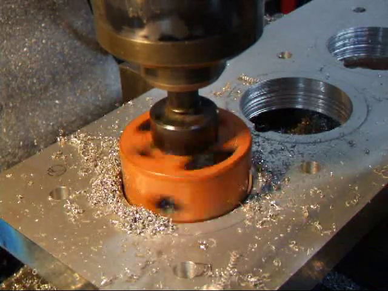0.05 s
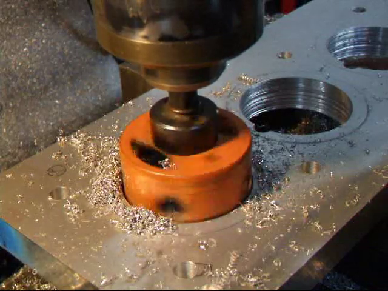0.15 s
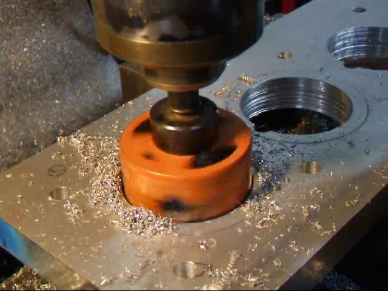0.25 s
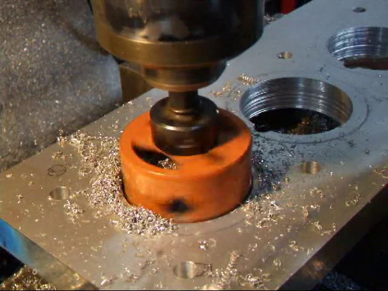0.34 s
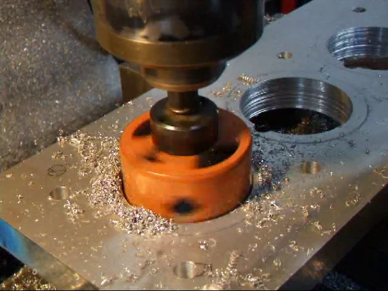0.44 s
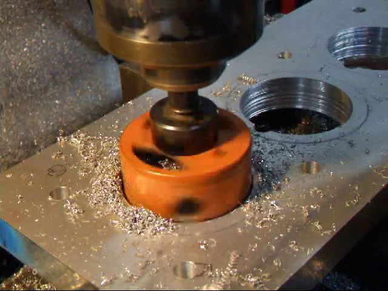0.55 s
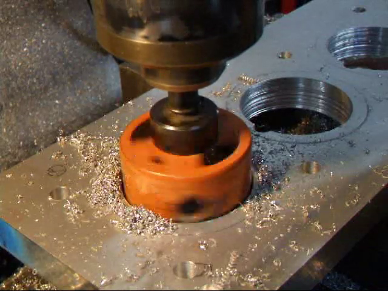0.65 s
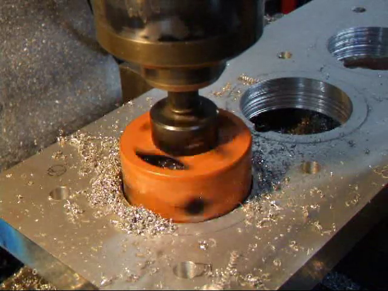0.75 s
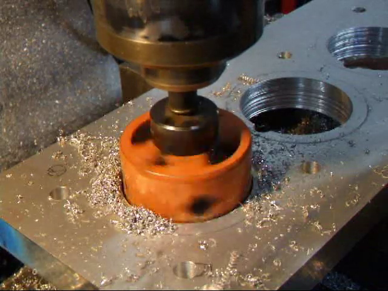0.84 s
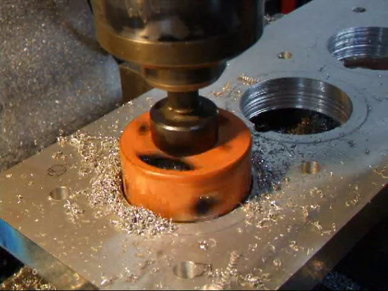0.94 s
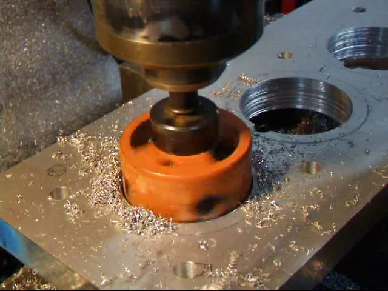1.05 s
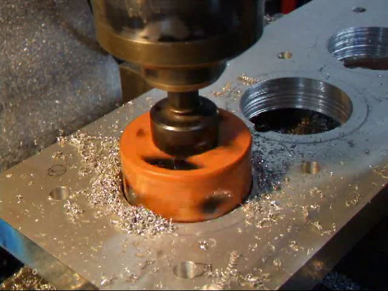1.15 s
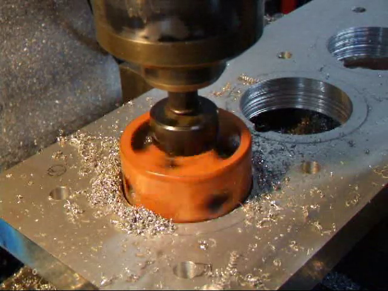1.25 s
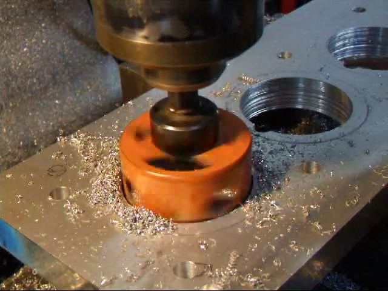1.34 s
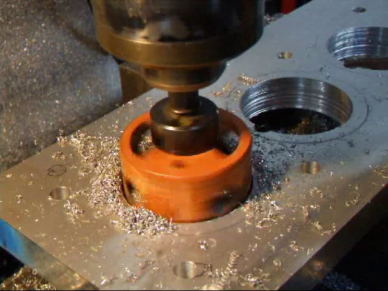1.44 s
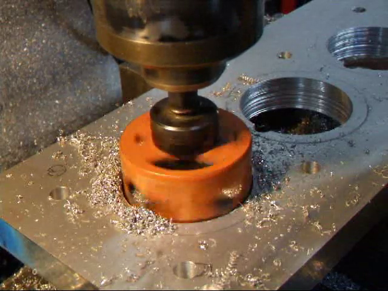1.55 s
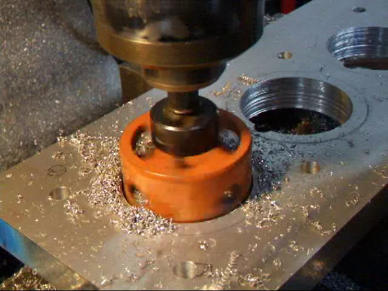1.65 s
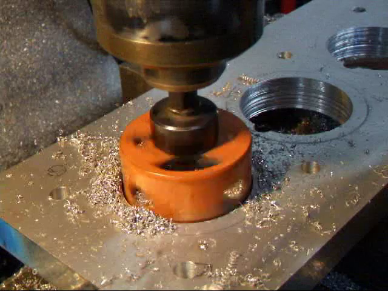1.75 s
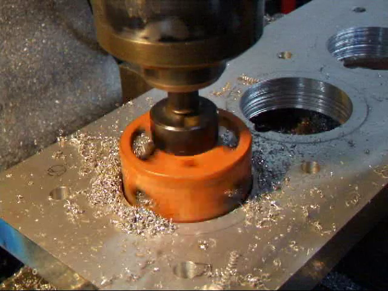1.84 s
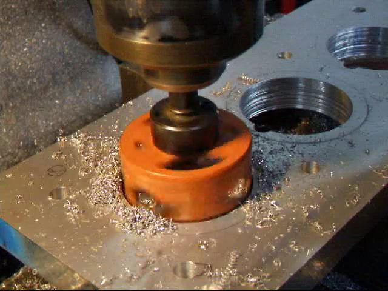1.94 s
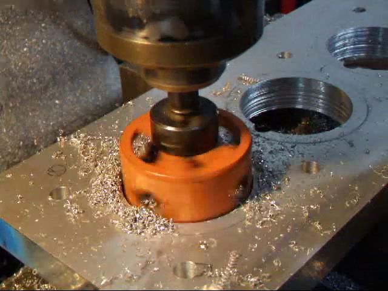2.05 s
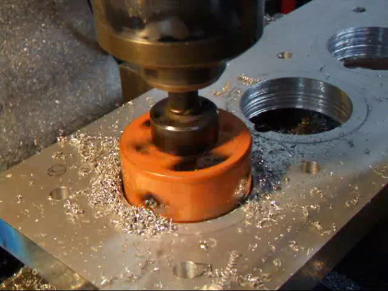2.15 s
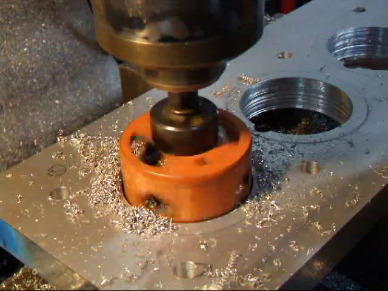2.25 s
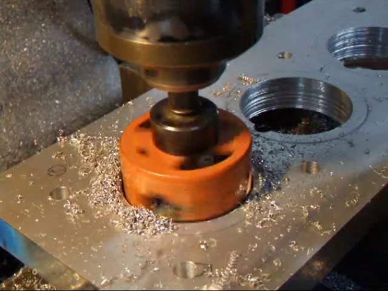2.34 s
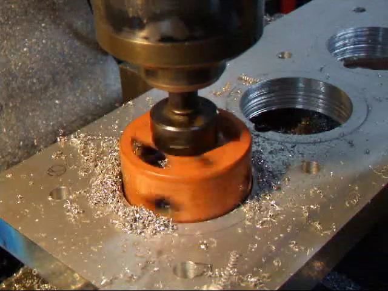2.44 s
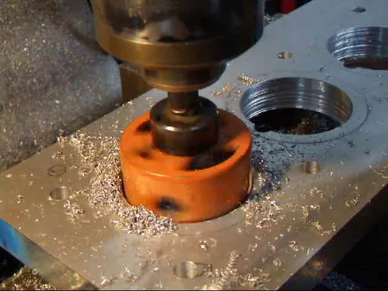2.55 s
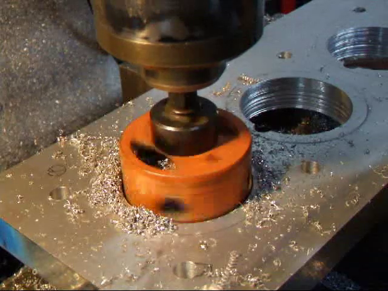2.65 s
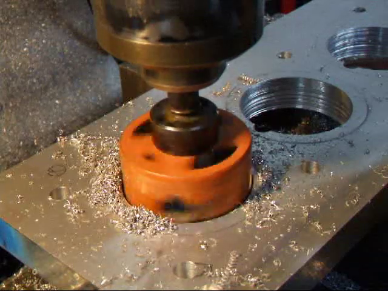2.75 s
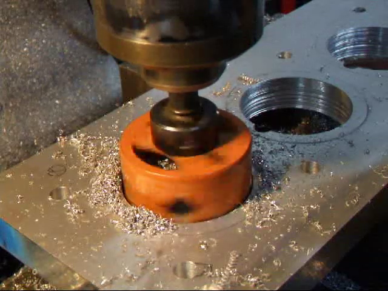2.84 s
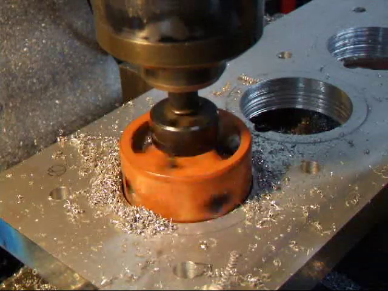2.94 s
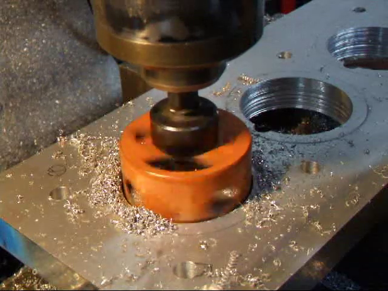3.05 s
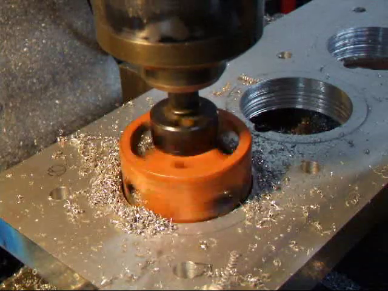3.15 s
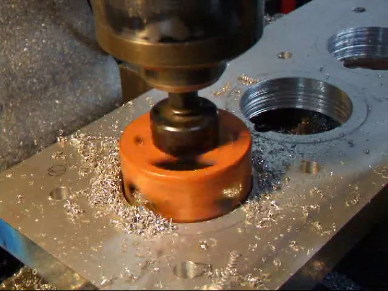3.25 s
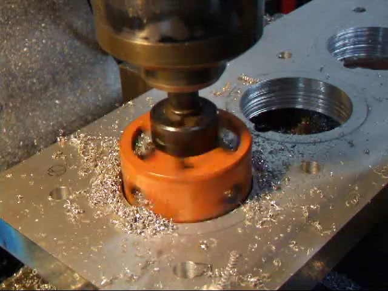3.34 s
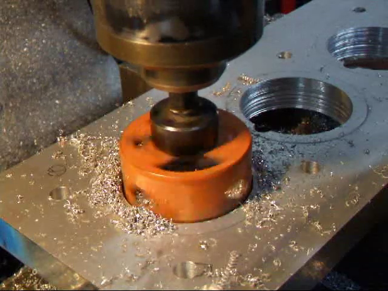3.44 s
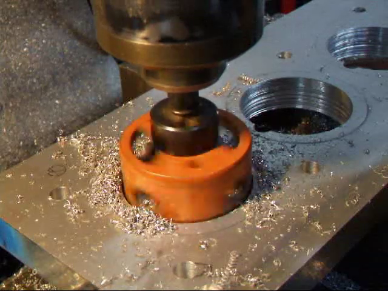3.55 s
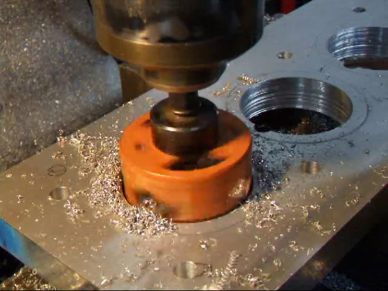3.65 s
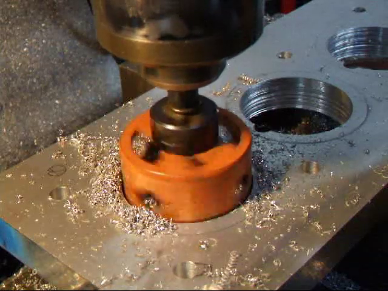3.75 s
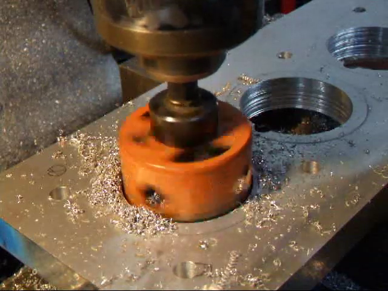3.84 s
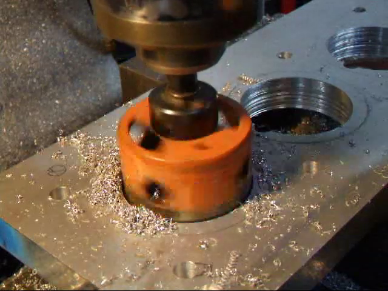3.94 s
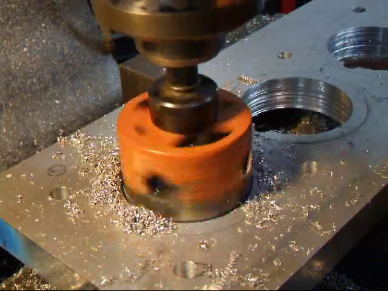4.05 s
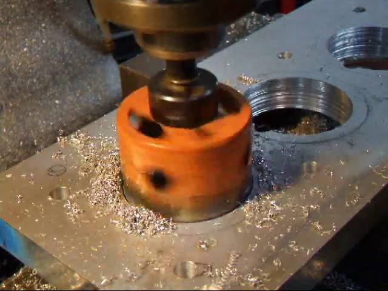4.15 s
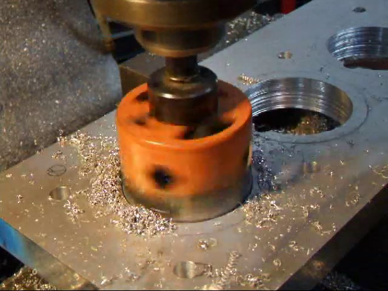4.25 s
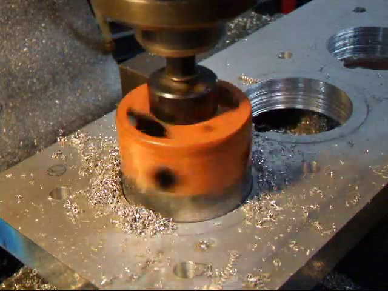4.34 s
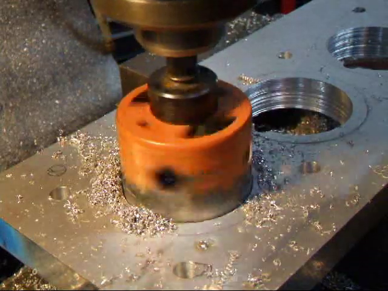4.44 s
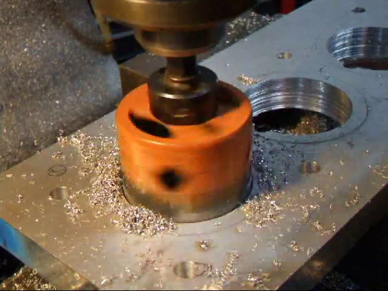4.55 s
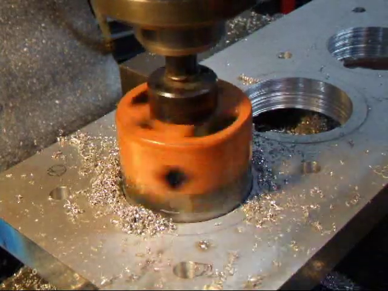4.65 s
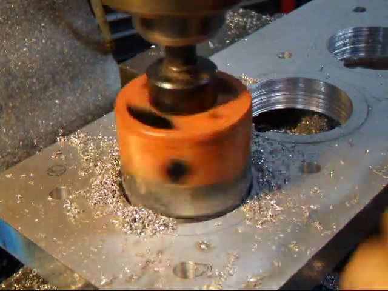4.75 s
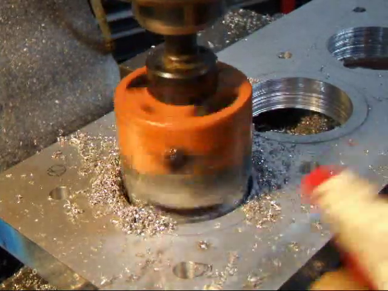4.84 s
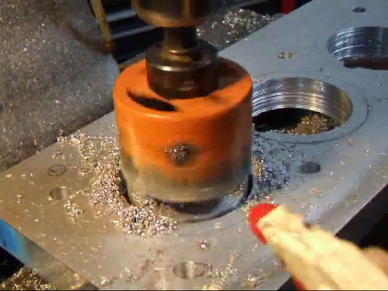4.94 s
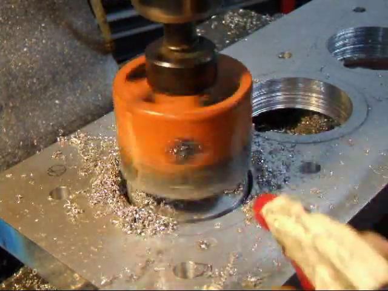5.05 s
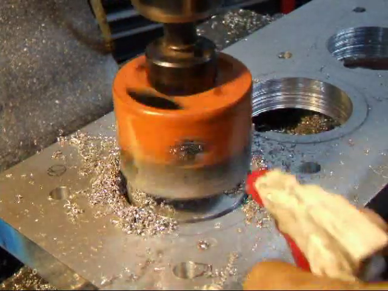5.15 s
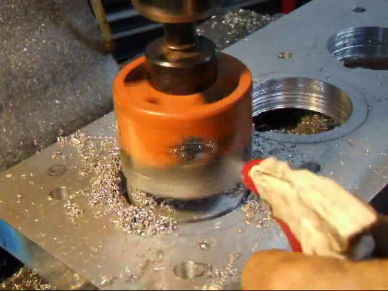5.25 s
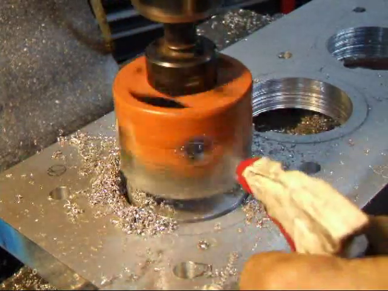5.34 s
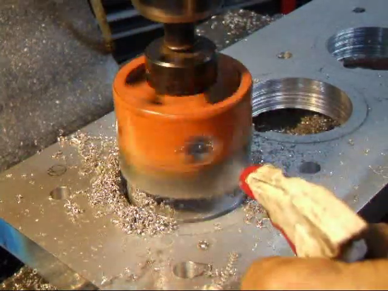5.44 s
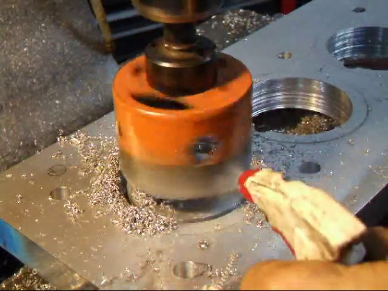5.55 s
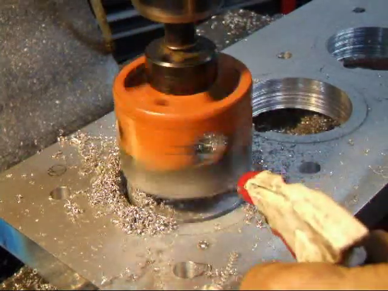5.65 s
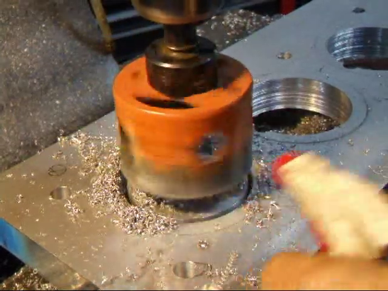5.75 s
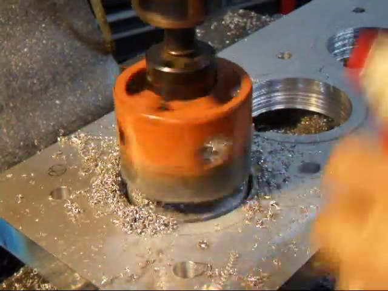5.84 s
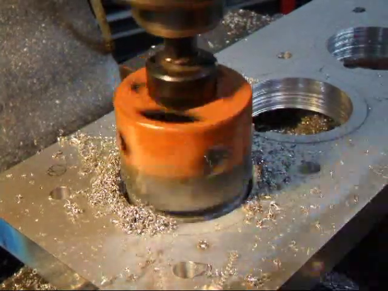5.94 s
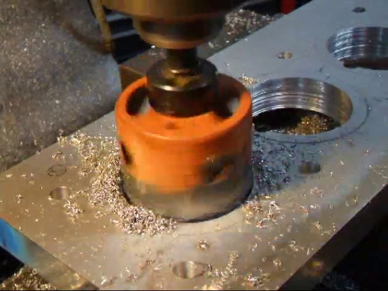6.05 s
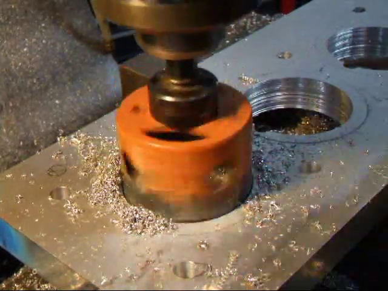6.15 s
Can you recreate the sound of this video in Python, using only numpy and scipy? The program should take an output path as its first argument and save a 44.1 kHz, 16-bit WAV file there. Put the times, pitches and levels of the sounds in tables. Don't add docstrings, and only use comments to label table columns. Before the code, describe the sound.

A milling machine cuts metal with coarse, uneven chatter: abrupt honking rasps about every half second, gritty and bright, over low rumble. The cutting stops past the middle, leaving a few hard metallic clacks and thin, high squeaks as the saw comes out. Then mainly the machine runs, a fluttering gear whine and hollow roar gradually rising. The close microphone catches little room echo, dull at the very top.

```python
import sys
import numpy as np
from scipy import signal
from scipy.fft import rfft, irfft
from scipy.io import wavfile
from scipy.ndimage import uniform_filter1d

SR = 44100
rng = np.random.default_rng(int(sys.argv[2]) if len(sys.argv) > 2 else 0)


def boost_factor(decibels):
    exponent = np.asarray(decibels, float) / 20
    return 10 ** exponent


def persist_wave(psi):
    counts = np.round(np.clip(psi, -1, 1) * 32767).astype(np.int16)
    wavfile.write(sys.argv[1], SR, np.atleast_2d(counts).T)


N = 273861
TIME = np.arange(N) / SR
STEP = 32

# frequency in Hz, density in dB per Hz.
ROAR_SPECTRUM = [(190, -50), (330, -19.5), (597, -9.5), (664, -9), (728, -9), (873, -9.5), (1060, -8.5),
                 (2240, -22), (5420, -25.5), (8040, -31), (10900, -33.5), (11600, -26), (12500, -114),
                 (16200, -144), (22000, -120)]
RUMBLE_SPECTRUM = [(50, -12), (85, -10), (113, 7), (179, -3), (205, -4), (247, 6.5), (340, -12), (440, -39),
                   (750, -120)]
HUM_SPECTRUM = [(8.8, -29), (15, -18), (19, 3), (32, -2), (65, 3), (90, -1), (120, -23), (200, -120)]
# frequency in Hz, width in Hz, level in dB.
HOUSING_MODES = [(369, 73, -9.5), (596.3, 11, -5.5), (1096, 146, -6.5)]
BEARING_WHISTLES = [(3741, 10, -21), (2390, 10, -19)]
# frequency in Hz, level in dB, swell in dB, lag in turns.
GEAR_LINES = [(377.3, -14.5, 6, 0), (633, -10, 1, 1), (603, -18, 8.5, 0.27), (584.5, -14, 9.5, 0.44)]
MAIN_MESH = (728.7, -4, 10.5, 0)
BELT_DRONE = (99.5, -4.5, 3.5, 3.5)
PULSING_WHISTLE = (4810, -20, 6, 0)
# time in seconds, level in dB.
IDLE_GAIN = [(0, -40), (3.75, -40.5), (3.85, -43.5), (4.04, -43), (4.16, -40), (4.7, -34.5), (5.3, -33),
             (6.0, -32), (6.21, -29.5)]
# centre in seconds, half length in seconds, depth in dB.
BASS_DIPS = [(.2, 0.09, -2.5), (.52, 0.057, -19), (.97, 0.065, -36), (1.08, .06, -5), (1.21, 0.092, -8),
             (1.8, 0.086, -26), (2.23, 0.12, -26), (2.6, 0.075, -8), (3.03, 0.064, -36),
             (3.445, 0.059, -30)]
SHAFT_HZ, SHAFT_PEAK_S = 11.06, 4.519
HUM_DB = -62.5
BASS_DB, GROWL_BASS_DB, CUT_BASS_DB = -4, 6, -4.5
BASS_FOLLOW = 0.64

# start in seconds, peak in dB, main ring in Hz, rim rings in dB.
BORE_KNOCKS = [
    (3.6681, -11, 3052, -17),
    (3.716, -11, 1555, -21),
    (4.1172, -16.5, 1568, -38),
    (4.2052, -8.5, 1650, -24),
    (4.4578, -16, 1740, -18),
    (6.1948, -9.5, 1560, -21),
]
# multiple of the main ring, level in dB.
KNOCK_PARTIALS = [(1, 0.5), (1.32, -5), (1.55, -6.5), (2.1, -10), (2.9, -17)]
# frequency in Hz, width in Hz, level in dB.
RIM_MODES = [(7450, 72, 10.5), (8100, 85, 10.5), (5590, 182, 7.5)]
# slip in seconds, swell in seconds, level in dB.
RIM_SQUEAKS = [
    (4.22, .02, -39),
    (4.41, 0.11, -47),
    (4.47, .02, -46),
    (4.6, 0.095, -44),
    (4.81, .12, -38),
]
SWELL_DB, SLIP_S = -21, 0.011
LIFT_S, LIFT_DB, LIFT_FADE_S = 3.76, -9.5, 0.21

# start in seconds, peak in dB.
CHIP_SNAPS = [(0.1187, 3), (0.4818, -15), (0.905, 1), (1.2986, -15), (1.4417, 1.5), (1.553, -7),
              (1.718, -19), (2.161, -2), (2.5731, -19), (2.7954, -3), (2.8292, 1), (2.9774, -4),
              (3.0989, 0.5), (3.182, -3.5), (3.2113, -25), (3.235, -1), (3.405, -18), (3.468, 0),
              (3.6607, -6), (3.7176, -3.5)]
RISE_S = .003
BLOW_HZ, BLOW_DB = 1620, -16

# frequency in Hz, density in dB per Hz.
SCRAPE_SPECTRUM = [(350, -60), (600, -115), (717, -20), (878, -16), (1010, -16.5), (1320, -15.5),
                   (2340, -19), (3010, -15.5), (4410, -21), (5070, -24.5), (6710, -16), (10900, -24),
                   (12500, -46), (16200, -77), (22000, -120)]
# frequency in Hz, width in Hz, level in dB.
CUP_MODES = [(1330, 8, -17), (1740, 310, -20), (2670, 230, -5.5), (3255, 53, -9), (4050, 76, 0.5),
             (5000, 340, -12), (5060, 280, 8.5), (5550, 340, 4), (6860, 67, -14), (9170, 13, -2),
             (11200, 190, -4)]
PLATE_MODES = [(800, 4.6, -18.5), (959, 14, -7), (1100, 280, -9.5), (1335, 46, -3)]
# multiple of the chatter, level in dB.
OVERTONES = [(2, 3.5), (3, -6), (4, -4)]
CUP_OVERTONES = [(4, -8), (5, -12), (6, -7), (7, -3), (8, -13), (9, -15.5), (11, -10), (12, -5), (13, -13),
                 (15, -9)]
HALF_LINES = [(1.5, -20.5), (2.5, 5), (3.5, -0.5), (4.5, -1.5), (5.5, -8.5), (6.5, -3), (7.5, -16),
              (8.5, -9), (9.5, -10.5)]
# time in seconds, share from 0 to 1.
GROWL = [(1.28, 0), (1.3, 1), (1.45, 1), (1.475, 0)]
# catch in seconds, hold in seconds, scrape in dB, chatter in dB, chatter change over the hold in dB.
BITES = [
    (.115, 0.16, -22, -26, -3),
    (.482, 0.18, -20.5, -19, -12),
    (0.904, 0.28, -20.5, -22, -14),
    (1.719, 0.26, -19.5, -21.5, -10),
    (2.157, 0.19, -21, -23.5, -8.5),
    (2.572, .27, -20, -22.5, -14),
    (2.977, .2, -20.5, -24, -9.5),
    (3.401, 0.2, -21, -24, -10.5),
]
GRIPS = [
    (1.09, 0.18, -23.5, -26.5, -4.5),
    (1.29, 0.15, -24, -29, 5),
    (1.48, 0.029, -29, -28.5, -1.5),
    (3.2, .04, -30, -30, -4),
    (3.65, 0.072, -29, -33, 6.5),
]
# centre in seconds, peak in dB, half length in seconds.
RING_UPS = [(0.336, -27, 0.018), (0.728, -28.5, 0.043), (1.58, -28.5, 0.035), (2.02, -30.5, 0.024),
            (2.416, -26.5, 0.044), (2.895, -27, 0.046), (2.961, -32, 0.017), (3.274, -27.5, 0.054)]
TEETH_HZ = 53
CATCH_RISE_S, GRIP_RISE_S, LET_GO_S = .009, .02, .045
CREEP_S, CREEP_DB = 0.024, 8.5
THIN_DB_PER_S, RUB_DB, RUB_TONE_DB = 29, -40.5, -40
CUT_HZ, FREE_HZ, CLIMB_HZ_PER_S = 428, 469.3, 55
SHALLOW_HZ, GROWL_SINK_HZ = 9, 9
OVER_DB, OVER_KNEE_DB, OVER_TRADE = -26, -24.5, 0.67
OVER_DROP, BUILD_S, OVER_FOLLOW = 0.99, 0.07, 0.25
HALF_DB, HALF_GROW_DB = -54.5, 23.5
WEAR_LINE_DB, WEAR_GRAIN_DB = -5.5, 5

# frequency in Hz, side minus mid in dB.
SIDE_SPECTRUM = [(60, -51), (150, -15), (360, -23), (880, -24.5), (2160, -15.5), (5290, -16.5),
                 (13000, -10.5)]
LEAN_DB = -0.48
CEILING = 1
# frequency in Hz, share of bands lost from 0 to 1.
DROPOUT = [(100, 0), (7000, .004), (8800, .03), (10000, .08), (10800, .2), (11250, .5), (11450, 1),
           (22000, 1)]


def evened(x):
    return x / np.sqrt(np.mean(x ** 2) + 1e-20)


def curves(rows, t=TIME):
    s, *columns = np.transpose(rows)
    return [np.interp(t, s, c) for c in columns]


def bumps(rows, t):
    return sum(height * np.clip(2 - 2 * abs(t - s) / half, 0, 1) for s, half, height in rows)


def drift(ms):
    size = max(int(ms * SR / 1000), 2)
    smooth = uniform_filter1d(rng.standard_normal(N), size)
    return evened(uniform_filter1d(smooth, size))


def coloured(x, points):
    f, db = np.transpose(points)
    hz = np.fft.rfftfreq(N, 1 / SR)
    gain_db = np.interp(np.log(hz + 1), np.log(f + 1), db)
    return irfft(rfft(x) * boost_factor(gain_db), N)


def resonate(x, hz, width):
    b, a = signal.iirpeak(hz, hz / max(width, 2), SR)
    return signal.lfilter(b, a, x)


def modes(x, rows):
    return sum(boost_factor(db) * evened(resonate(x, hz, width)) for hz, width, db in rows)


def gear(hz, db, swell_db, lag):
    shaft = 2 * np.pi * (SHAFT_HZ * (TIME - SHAFT_PEAK_S) - lag)
    turns = hz * TIME + .025 * np.sin(shaft) + .02 * drift(30) + rng.random()
    return boost_factor(db + swell_db * np.cos(shaft) + drift(53)) * np.cos(2 * np.pi * turns)


def machine():
    growl, = curves(GROWL)
    idle_db, = curves(IDLE_GAIN)
    gain_db = idle_db + 0.7 * bumps(BASS_DIPS, TIME)
    bass_db = BASS_FOLLOW * (idle_db + 36) - 36 + BASS_DB
    bass_db += CUT_BASS_DB * (TIME < LIFT_S) + GROWL_BASS_DB * growl

    roar_swell_db = 0.57 * np.cos(2 * np.pi * SHAFT_HZ * (TIME - SHAFT_PEAK_S + 0.021))
    noise = rng.standard_normal(N) * boost_factor(1.2 * drift(2.8) + roar_swell_db)
    whistle_swell = boost_factor(1.9 * np.cos(2 * np.pi * SHAFT_HZ * (TIME - SHAFT_PEAK_S)))
    rings = modes(noise, HOUSING_MODES) + whistle_swell * modes(noise, BEARING_WHISTLES)
    roar = boost_factor(-0.97) * evened(coloured(noise, ROAR_SPECTRUM)) + boost_factor(-8.0) * rings

    slack = np.interp(TIME, [3.75, 4.3], [.2, 1])
    whine = gear(*PULSING_WHISTLE) + slack * gear(*MAIN_MESH)
    whine += np.sqrt(slack) * sum(gear(*line) for line in GEAR_LINES)
    rumble = evened(coloured(rng.standard_normal(N), RUMBLE_SPECTRUM)) + gear(*BELT_DRONE)
    return boost_factor(gain_db + 5) * (roar + whine) + boost_factor(bass_db - 2.2) * rumble


def bore_knocks():
    t, knocks = np.arange(3000) / SR, np.zeros(N)
    decay = boost_factor(-60 * t / 0.035)
    for s, db, hz, rim_db in BORE_KNOCKS:
        ring = decay * sum(boost_factor(d) * np.sin(2 * np.pi * k * hz * t) for k, d in KNOCK_PARTIALS)
        crack = 1.6 * decay * uniform_filter1d(rng.standard_normal(len(t)), size=3)
        rim = sum(boost_factor(rim_db + d - 60 * t / 0.098) * np.sin(2 * np.pi * f * t) for f, _, d in RIM_MODES)
        knock = boost_factor(db - 9) * np.minimum(t / RISE_S, 1) * (ring + crack + rim)
        part = knocks[round(s * SR):][:len(t)]
        part += knock[:len(part)]
    return knocks


def rim_squeaks():
    swells = [db + SWELL_DB * np.maximum((s - TIME) / swell, (TIME - s) / SLIP_S)
              for s, swell, db in RIM_SQUEAKS]
    level_db = np.max(swells, axis=0)
    return boost_factor(level_db - 8.0) * modes(rng.standard_normal(N), RIM_MODES)


def snaps():
    t, puffs = np.arange(1500) / SR, np.zeros(N)
    onset = np.minimum(t / RISE_S, 1)
    for s, db in CHIP_SNAPS:
        part = puffs[round(s * SR):][:len(t)]
        part += boost_factor(db - 8.0 - 60 * t / 0.048) * onset * rng.standard_normal(len(t))
    for s, *_ in BITES:
        part = puffs[round(s * SR):][:len(t)]
        part += boost_factor(BLOW_DB - 60 * t / 0.082) * onset * np.sin(2 * np.pi * BLOW_HZ * t)
    return coloured(puffs, [(f, .5 * db + 3.5) for f, db in SCRAPE_SPECTRUM])


def engagement():
    t = np.arange(0, N + STEP, STEP) / SR
    lift = LIFT_DB * np.clip((t - LIFT_S) / LIFT_FADE_S, 0, 1)
    rub_db, rub_tone_db, rub_half_db = RUB_DB + .5 * lift, RUB_TONE_DB + lift, HALF_DB + lift
    scrape_db, tone_db, half_db = rub_db, rub_tone_db, rub_half_db
    held, pull, wear = np.zeros((3, len(t)))
    for rows, rise, thin in ((BITES, CATCH_RISE_S, THIN_DB_PER_S), (GRIPS, GRIP_RISE_S, 0)):
        for s, hold, db, chatter_db, fade_db in rows:
            inside = np.clip(t - s, 0, hold)
            done = inside / hold
            let_go = np.exp(-np.maximum(t - s - hold, 0) / LET_GO_S)
            grip = np.clip((t - s) / rise + 1, 0, 1) * let_go
            creep = CREEP_DB * np.exp(-abs(t - s) / CREEP_S) * (t < s)
            scrape_lift = np.maximum(creep, grip * (db - thin * inside - RUB_DB))
            tone_lift = np.maximum(creep, grip * (chatter_db + fade_db * done - RUB_TONE_DB))
            scrape_db = np.maximum(scrape_db, rub_db + scrape_lift)
            tone_db = np.maximum(tone_db, rub_tone_db + tone_lift)
            half_db = np.maximum(half_db, rub_half_db + grip * HALF_GROW_DB * done)
            held = np.maximum(held, grip * min(hold / BUILD_S, 1))
            wear = np.maximum(wear, grip * done ** 2 * (thin > 0))
            climb = CLIMB_HZ_PER_S * inside if thin else SHALLOW_HZ
            pull = np.maximum(pull, grip ** 2 * (FREE_HZ - CUT_HZ - climb))
    over_db = OVER_DB - OVER_TRADE * np.maximum(tone_db - OVER_KNEE_DB, 0) - 10 * OVER_DROP * (1 - held)
    over_db += lift + OVER_FOLLOW * (scrape_db + 22)
    for s, db, half in RING_UPS:
        tone_db = np.maximum(tone_db, db - 10 * ((t - s) / half) ** 4)
    sink = GROWL_SINK_HZ * uniform_filter1d(curves(GROWL, t - .03)[0], size=100)
    return curves(np.transpose([t, FREE_HZ - pull - sink, tone_db, over_db, scrape_db, half_db, wear]))


def fluttering(lines, turns):
    total = np.zeros(N)
    for k, db in lines:
        phase = k * turns + .07 * drift(9) + rng.random()
        total += boost_factor(db + 3 * drift(12)) * np.cos(2 * np.pi * phase)
    return total


def cutting():
    hz, tone_db, over_db, scrape_db, half_db, wear = engagement()
    growl, = curves(GROWL)
    half_db = np.maximum(half_db, -90 + 62 * growl)
    load = np.clip((scrape_db + 46.5) / 10, 0, 1)
    throb = boost_factor(2.2 * np.cos(2 * np.pi * (TEETH_HZ * TIME + .15 * drift(40))))

    turns = np.cumsum(hz * (1 + 0.00512 * drift(7.5))) / SR
    tone = np.sqrt(2) * boost_factor(tone_db - .4 + 2.6 * drift(9)) * np.cos(2 * np.pi * (turns + .07 * drift(7)))
    locked = np.cumsum(np.minimum(hz, 441) * (1 + .0025 * drift(8))) / SR
    whole = fluttering(OVERTONES, locked)
    high = fluttering(CUP_OVERTONES, locked)
    half = fluttering(HALF_LINES, locked)

    cycle_gate = .6 + np.exp(-(turns % 1) / .3)
    grit = cycle_gate * rng.standard_normal(N) * boost_factor(1.1 * drift(2.5))
    plate = modes(grit, PLATE_MODES)
    body = boost_factor(-0.5 + WEAR_LINE_DB * wear) * whole + boost_factor(-4 + WEAR_GRAIN_DB * wear) * plate
    buzz = boost_factor(over_db) * throb * body + boost_factor(half_db - 2.0) * half * load ** 2
    squeal = boost_factor(1.5 * (scrape_db + 21) - 24 - 8 * wear + 2 * growl) * high

    scrape = evened(coloured(grit, SCRAPE_SPECTRUM)) + boost_factor(-6.5) * evened(modes(grit, CUP_MODES))
    scrape_level = boost_factor(scrape_db - .6 - 2 * growl + .7 * drift(25)) * throb ** .3
    return tone + load * buzz + squeal + scrape_level * evened(scrape)


def shop(x):
    taps = np.zeros(12000)
    at = np.arange(200, len(taps) - 22, 22)
    signs = rng.choice([-1., 1.], len(at))
    taps[at + rng.integers(0, 22, len(at))] = signs * boost_factor(-60 * at / SR / 0.17)
    return signal.fftconvolve(x, taps / np.linalg.norm(taps))[:N]


def scene():
    near = machine() + bore_knocks() + rim_squeaks() + snaps() + cutting()
    hum_mid, hum_side = [boost_factor(HUM_DB) * evened(coloured(rng.standard_normal(N), HUM_SPECTRUM)) for _ in range(2)]
    mid = near + boost_factor(-23) * shop(near) + hum_mid
    side = coloured(shop(near), SIDE_SPECTRUM) + boost_factor(-12) * hum_side
    return np.array([boost_factor(LEAN_DB / 2) * mid + side, boost_factor(-LEAN_DB / 2) * mid - side])


def band_dropouts(x):
    hz, t, z = signal.stft(x, SR, nperseg=1024)
    lost = np.interp(hz, *np.transpose(DROPOUT))[:, None]
    idle_notch = np.outer(abs(hz - 8000) < 320, (t > 4.85) & (t < 6.15))
    lost = lost + 0.68 * idle_notch
    chance = rng.random((len(t) // 3 + 1, len(hz) // 4 + 1))
    chance = chance.repeat(3, axis=0).repeat(4, axis=1).T[:len(hz), :len(t)]
    kept = z * ((chance > lost) + 1e-4)
    kept *= boost_factor(np.outer((hz > 88) & (hz < 345), bumps(BASS_DIPS, t)))
    stray = (chance > .965) * ((hz > 11450) & (hz < 13300))[:, None]
    kept[1] += boost_factor(-7) * stray * np.roll(z[1], 50, axis=0)
    return signal.istft(kept, SR, nperseg=1024)[1][:, :N]


def low_pass(x):
    return signal.sosfilt(signal.butter(12, 13550, fs=SR, output="sos"), x)


def record(dry):
    soft = CEILING * np.tanh(dry / CEILING)
    mix = band_dropouts(soft) - .0037
    return low_pass(mix)


dry = scene()
out = record(dry)
persist_wave(out)
```